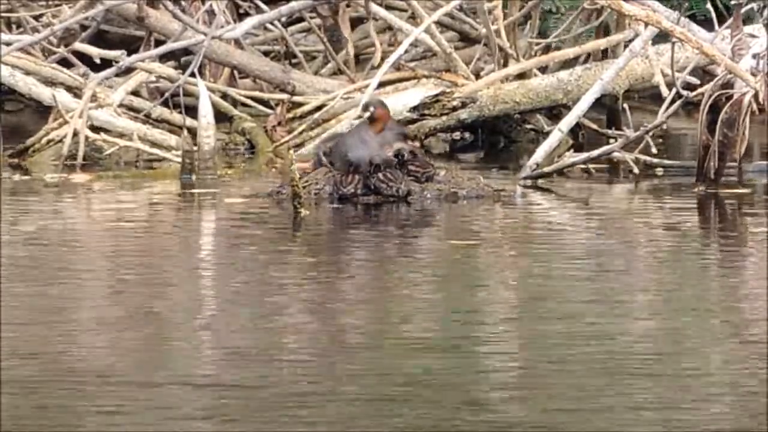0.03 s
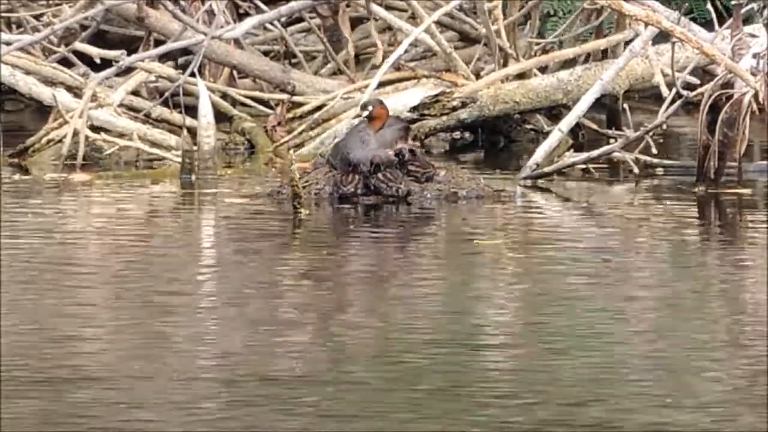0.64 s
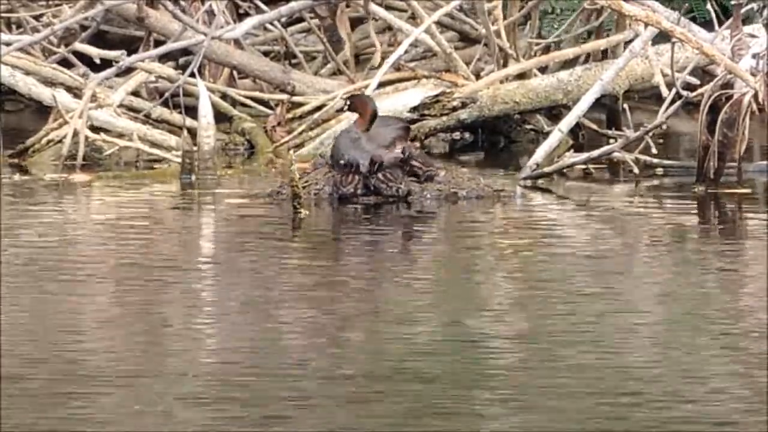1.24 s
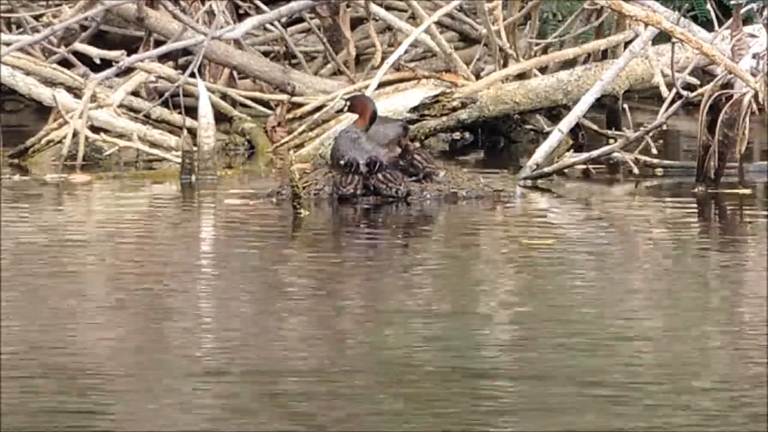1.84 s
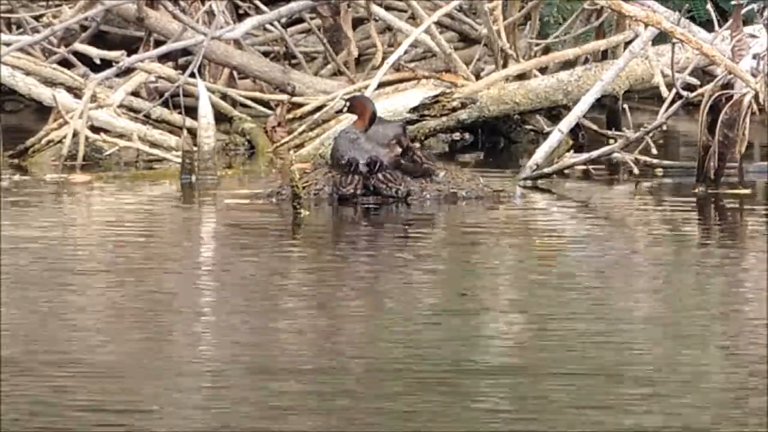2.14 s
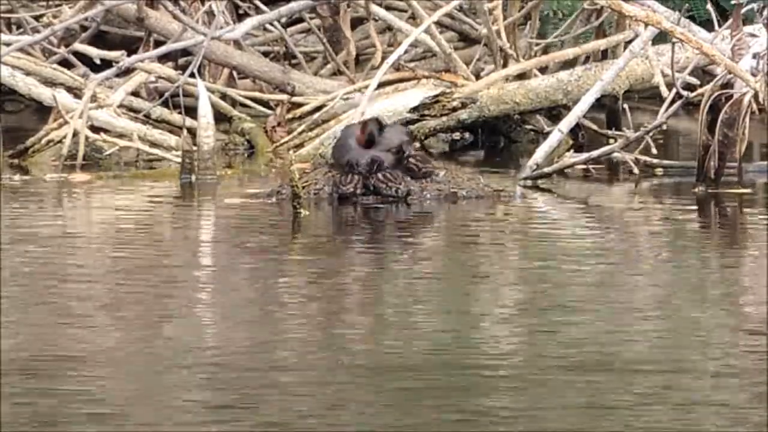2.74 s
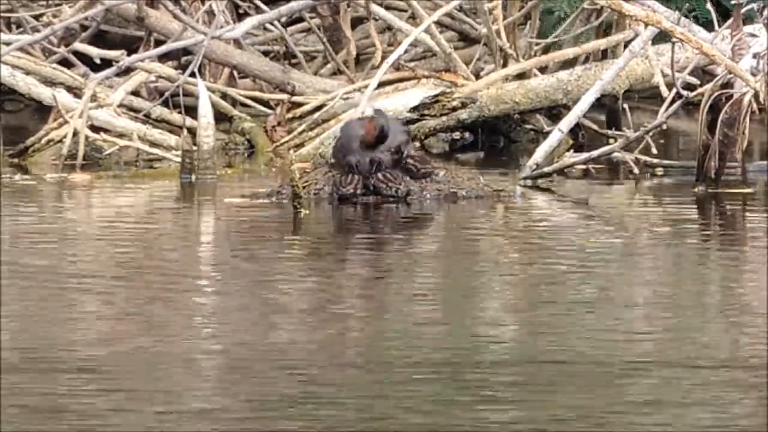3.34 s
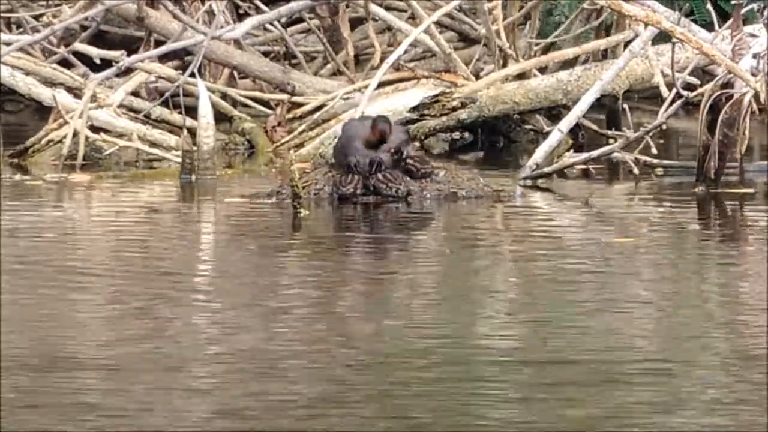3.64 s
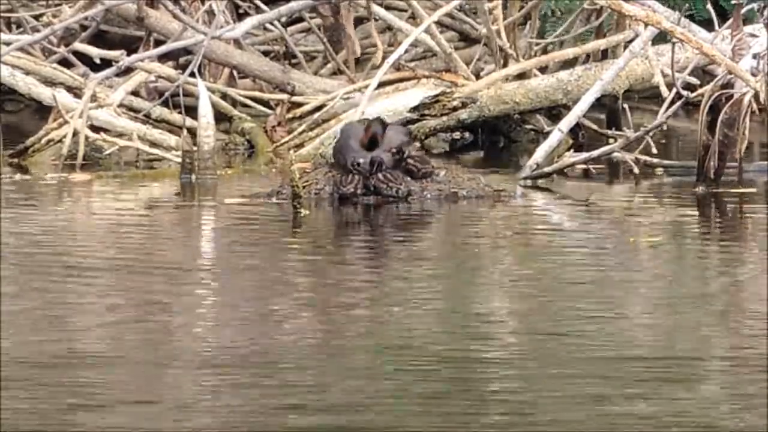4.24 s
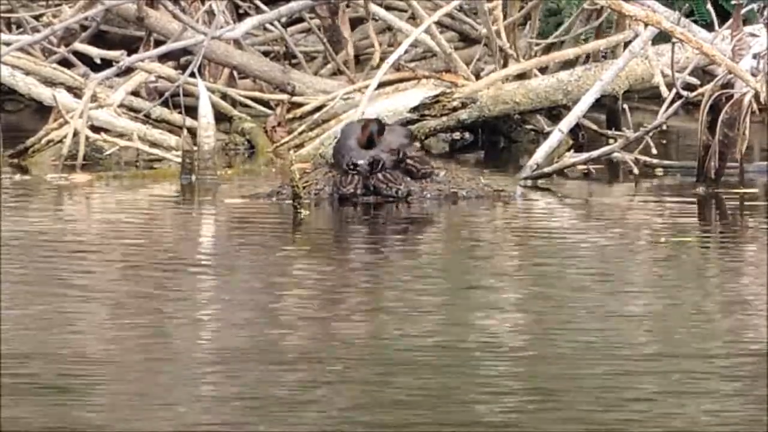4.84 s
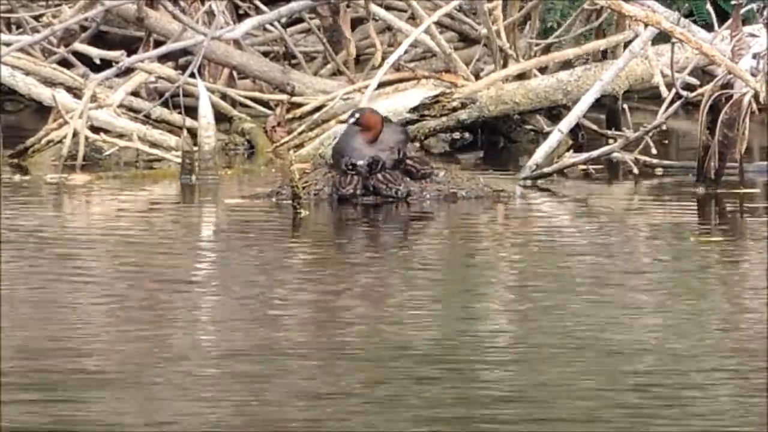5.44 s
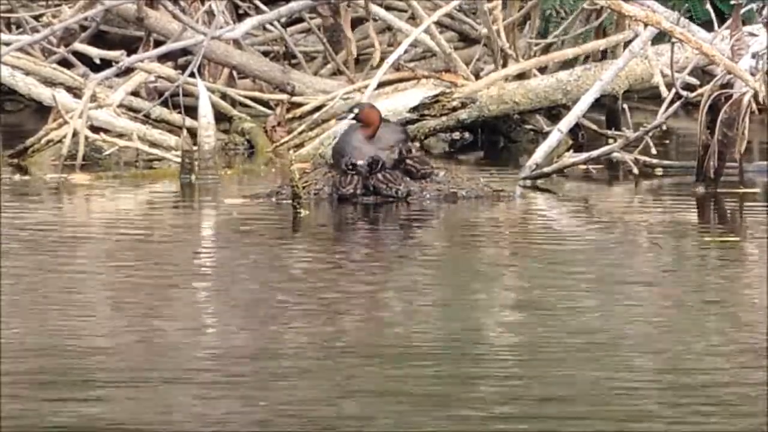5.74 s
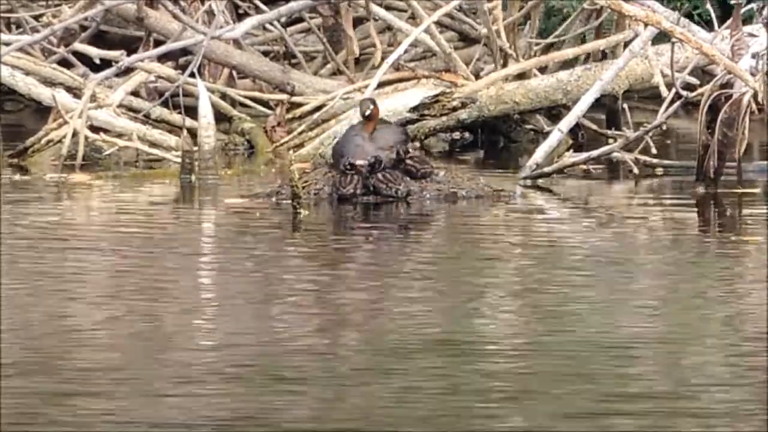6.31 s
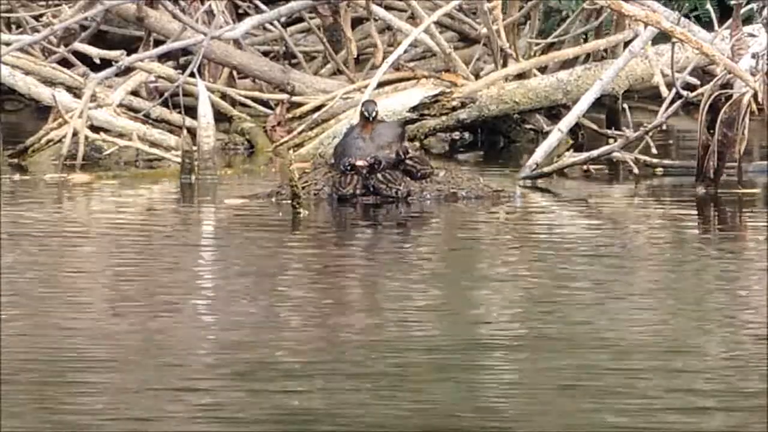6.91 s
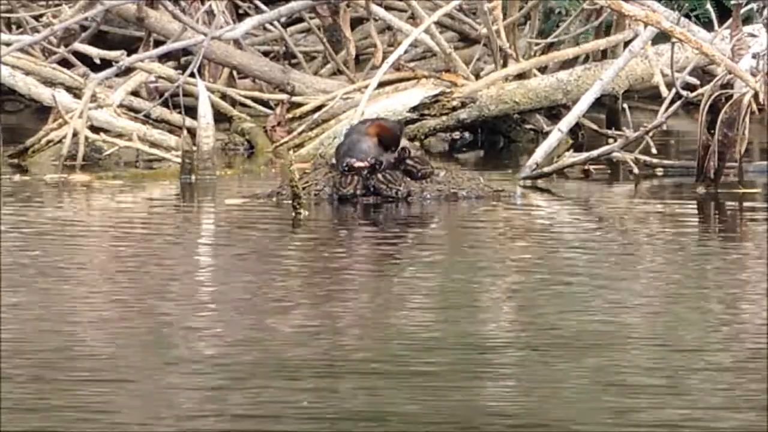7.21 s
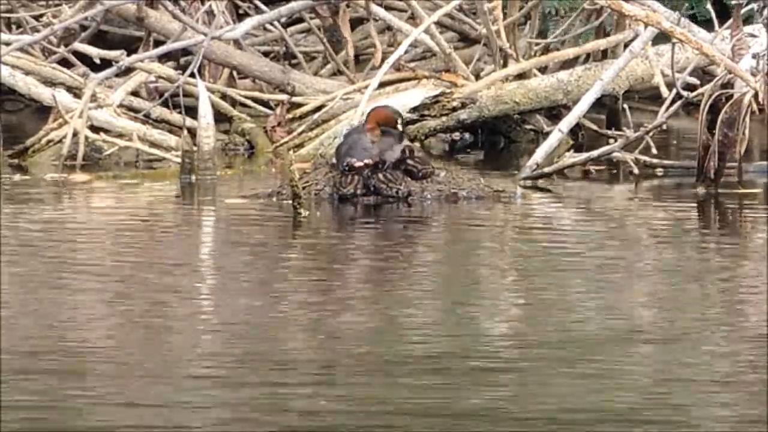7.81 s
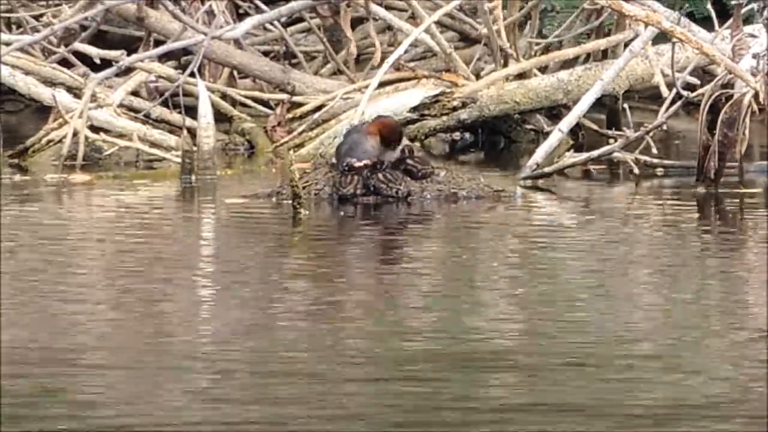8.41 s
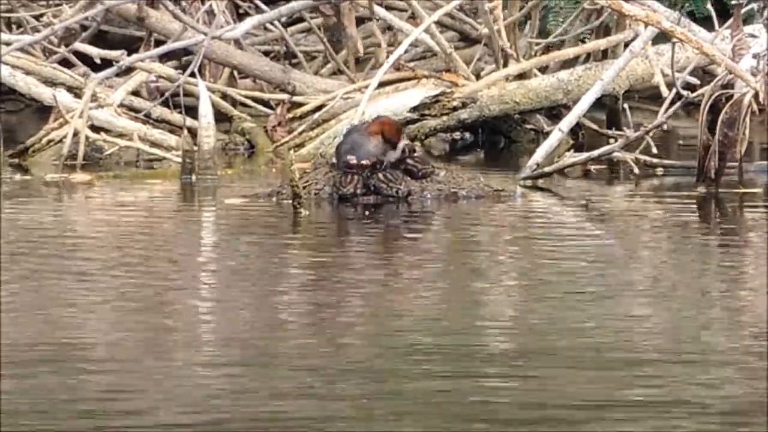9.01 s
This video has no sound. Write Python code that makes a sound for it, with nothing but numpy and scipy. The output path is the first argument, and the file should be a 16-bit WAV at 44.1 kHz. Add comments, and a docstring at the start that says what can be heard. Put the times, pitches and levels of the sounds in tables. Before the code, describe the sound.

At the edge of a pond, faint crickets and scattered bird chirps sit over a constant hiss and low road rumble. Midway, a small waterbird stands out with a fast trill of alternating dipping and rising notes, with a slight echo from the bank. Later a bird scolds faintly among soft dry ticks, a distant engine gathers speed, and another bird gives a short falling whistle.

```python
"""Distant traffic rumbles, bush-crickets buzz in the reeds and far birds whistle, cluck and chirp.
About four seconds in comes the main sound, a grebe trilling on the pond: two syllables take turns,
each a few quick glides of one whistle, echoed by the wooded bank. The crickets scrape their wings,
the two nearest in regular rising verses. A few soft ticks sound by the water's edge,
and near the end one engine gathers speed."""
import sys
import numpy as np
from scipy import signal
from scipy.fft import rfft, irfft
from scipy.io import wavfile

SR = 44100
rng = np.random.default_rng(int(sys.argv[2]) if len(sys.argv) > 2 else 0)


def log_audio(samples):
    """Write samples as a 16-bit WAV file to the path given in sys.argv[1]."""
    # one column per channel
    frames = np.atleast_2d(samples).T
    # limit to full scale, then quantise
    limited = np.clip(frames, -1, 1)
    pcm = np.round(limited * 32767).astype(np.int16)
    wavfile.write(sys.argv[1], SR, pcm)


N = 399546
TIME = np.arange(N) / SR

# The glides that make up the grebe's dipping and rising syllables. Each row: delay and length in
# seconds, base pitch at the start, middle and end in Hz, relative level and swell in dB, rattle (0-1).
DIP_GLIDES = [(.005, 0.0059, 2220, 2415, 2610, -0.5, -2, 0),
              (.018, 0.0269, 2782, 2100, 2180, 1.3, 5.5, 0.15), (.06, 0.0167, 3400, 3120, 3000, -10, 6, 1),
              (.064, .017, 2620, 2598, 2620, -3.5, 0, 0.7)]
RISE_GLIDES = [(0, 0.0245, 2022, 2183, 2190, -3, 2, 0.11), (.022, 0.008, 2200, 2345, 2760, 0.5, -3, 0),
               (.037, .034, 3520, 3270, 3400, -10.5, 1, 0), (.069, 0.0085, 3120, 2530, 2280, -5.5, 2, 0.25)]
# When each syllable is sung. Each row: start in seconds, relative level in dB, pitch multiplier,
# brightness in dB per octave, lean to the left in dB, accent on the last glide in dB.
DIP_CALLS = [(3.823, -45, 0.94, 3, 3, 2), (4.073, -42.5, 1.02, -7, 4, -1.5), (4.335, -45, 1.02, 1, 4, -2.5),
             (4.6, -43, 1, -2.5, 1, -1), (4.868, -44, 1, -5, 0, 1), (5.141, -41.5, 1.02, 10, -0.5, -1),
             (5.417, -42.5, 0.99, 5, 0, 0.5)]
RISE_CALLS = [(3.944, -46, 1.05, -8, 3, 0), (4.202, -45.5, 1.03, -3, 1, 0.5), (4.468, -42.5, 1, 6, 2, -1),
              (4.733, -42, 1.015, -2, -2.5, -3), (5.003, -42, 1, -1, 2, -2), (5.276, -44.5, 1, -15, 1, 5.5),
              (5.556, -43.5, 1, 4, 3, -2)]

def grebe(level_db=0.5):
    """Dipping and rising syllables take turns, seven to eight a second, slowing a little."""
    dips = calls(DIP_GLIDES, DIP_CALLS, rattle_hz=207, swing=0.07, jitter=0.017)
    rises = calls(RISE_GLIDES, RISE_CALLS, rattle_hz=210.5, swing=0.14, jitter=0.016)
    trill = water_reflection(throat(dips + rises))
    return gain_of(level_db) * bank_echo(
        trill, echo_db=-9.8, lag_samples=2, ring_hz=2200, ring_width_hz=170, ring_db=2.8,
        build_s=0.0089, far_bank_db=4, far_bank_s=0.1, spread_s=0.039, ahead=0.56)

def calls(glides, rows, rattle_hz, swing, jitter, flutter_db=1.44):
    """A bird repeats one pattern of glides; a bright call favours its high pitches."""
    out = np.zeros((2, N))
    centre_hz = np.median([row[3] for row in glides])
    for start, db, pitch, brightness, pan_db, accent_db in rows:
        for k, (delay, length, *pitches, glide_db, swell_db, rattle) in enumerate(glides):
            note = glide(length, pitch * np.array(pitches), jitter, rattle, rattle_hz, swing,
                         flutter_db=flutter_db)
            progress = np.linspace(-0.5, 0.5, len(note))
            octaves = np.log2(np.interp(progress, [-0.5, 0, 0.5], pitches) / centre_hz)
            level_db = db + glide_db + brightness * octaves + swell_db * progress
            level_db += accent_db * (k == len(glides) - 1)
            add(out, start + delay, gain_of(level_db) * note, pan_db)
    return out

def glide(length, pitches, jitter, rattle=0, rattle_hz=0, swing=0,
          taper=0.28, uneven=1, overtone_db=-32, flutter_db=1):
    """One note bends through three pitches; a rattle chops its level and swings its pitch."""
    t = np.arange(0, length, 1 / SR)
    hz = np.polyval(np.polyfit([0, 0.5, 1], pitches, 2), t / length)
    shake = rattle * np.cos(2 * np.pi * rattle_hz * t + uneven * wander(len(t), 60))
    flutter = gain_of(flutter_db * wander(len(t), 250))
    level = signal.windows.tukey(len(t), taper) * flutter * (1 + 0.5 * shake)
    return level * whistle(hz * (1 - swing * shake), jitter, overtone_db)

def whistle(hz, jitter, overtone_db):
    """A bird's voice box makes a nearly pure tone with an unsteady pitch."""
    phase = phase_of(hz * (1 + jitter * wander(len(hz), 600)))
    return np.sqrt(2) * (np.sin(phase) + gain_of(overtone_db) * np.sin(2 * phase))

def throat(x, hz=2400, width_hz=650, leak=0.36):
    """The throat rings at one pitch, swelling each glide that sweeps through it."""
    return leak * x + (1 - leak) * signal.lfilter(*signal.iirpeak(hz, hz / width_hz, SR), x)

def water_reflection(x, hz=2430, width_hz=420, depth=0.75):
    """Sound bouncing off the water weakens a narrow band on the left and boosts it on the right."""
    band = signal.lfilter(*signal.iirpeak(hz, hz / width_hz, SR), x)
    return x + band * np.array([[-depth], [0.25]])

# How long the bank echoes. Each row: frequency in Hz, seconds to fade by 60 dB when linger is 1.
BANK_FADE = [(500, 1), (2200, 0.8), (3400, 0.55), (4500, 0.6), (9000, 0.15)]

def bank_echo(x, echo_db, lag_samples, ring_hz=2300, ring_width_hz=350, ring_db=5, build_s=0.0017,
              far_bank_db=0, far_bank_s=0.089, spread_s=0.025, ahead=0.14, echoes_per_s=2500, linger=1):
    """Sound reaches the right side first; branches scatter an echo that the far bank can swell again."""
    t = np.arange(SR) / SR
    swell = (1 - np.exp(-t / build_s)) * gain_of(far_bank_db * bump(t, far_bank_s, spread_s))
    bounces = rng.standard_normal((3, SR)) * (rng.random((3, SR)) < echoes_per_s / SR) * swell
    # The share that comes from straight ahead is alike on both sides.
    bounces = np.sqrt(1 - ahead) * bounces[:2] + np.sqrt(ahead) * bounces[2]
    hz, seconds, bands = signal.stft(bounces, SR, nperseg=256)
    bands *= gain_of(-60 * seconds / (linger * at_hz(BANK_FADE, hz))[:, None])
    energy = np.mean(np.sum(signal.istft(bands, SR)[1] ** 2, axis=1))
    colour = gain_of(ring_db * bump(hz, ring_hz, ring_width_hz))[:, None]
    tail = signal.istft(bands * colour / np.sqrt(energy), SR)[1]
    echo = signal.fftconvolve(x.mean(0)[None], tail, axes=1)[:, :N]
    direct = np.array([np.roll(x[0], lag_samples), x[1]])
    return direct + gain_of(echo_db) * echo

# The glides of a cluck and when it is called. Rows read like DIP_GLIDES and DIP_CALLS.
CLUCK_GLIDES = [(0, 0.0075, 2200, 2350, 2650, -5, -3, .2), (.007, 0.0125, 2720, 2402, 2490, -4.5, 9, .5),
                (.02, 0.0066, 2490, 2314, 2150, 0, -1, 0.17), (.028, 0.011, 2480, 2445, 2470, -9.5, -4, .3),
                (.047, 0.015, 1660, 1888, 1990, -8, 3, .25)]
CLUCK_CALLS = [(1.258, -46, 1, -2, -6, 0), (1.575, -42.3, 1.004, -1, -6, 0),
               (7.402, -48.5, 1.03, 0, -7, 0.82), (7.579, -49.5, 1, 0, -5, 1)]

def clucking_bird():
    """Each cluck is three quick flicks of the voice, a soft ending and a low after-note."""
    clucks = calls(CLUCK_GLIDES, CLUCK_CALLS, rattle_hz=262, swing=0.055, jitter=0.033)
    return bank_echo(
        clucks, echo_db=-5.5, lag_samples=1, ring_hz=2370, ring_width_hz=170, ring_db=-4, build_s=0.0074,
        far_bank_db=2, far_bank_s=0.064, spread_s=0.0094, ahead=0.39, echoes_per_s=420, linger=0.75)

# The glides of a long whistle and when it is called. Rows read like DIP_GLIDES and DIP_CALLS.
WHISTLE_GLIDES = [(0, 0.022, 1850, 1835, 1830, -13, 5, .15),
                  (.012, 0.152, 1826, 1750, 1710, -4, -2.5, 0.03),
                  (.138, .065, 1730, 1496, 1260, -9, 7, 0.49)]
WHISTLE_CALLS = [(3.933, -47, 0.995, 0, -12, -0.098), (8.556, -47, 0.985, 0, -6.5, -0.84)]

def whistling_bird():
    """A long whistle holds nearly one pitch, then drops at its end."""
    song = calls(WHISTLE_GLIDES, WHISTLE_CALLS, rattle_hz=124, swing=0.14, jitter=0.0066, flutter_db=0.3)
    return bank_echo(song, echo_db=-10.5, lag_samples=8)

# Clear and rasping notes of far birds. Each row: start and length in seconds, middle pitch in Hz,
# slide in octaves, level in dB, lean to the left in dB.
CLEAR_NOTES = [(0.04, 0.24, 1617, -0.67, -65.5, -9), (0.887, 0.053, 2380, 0.057, -63.5, -5),
               (1.365, .022, 2980, -0.26, -61, -2), (1.875, 0.032, 2710, .32, -61.5, -5),
               (1.972, 0.031, 2960, -.2, -64, -3), (2.132, 0.02, 2745, 0.079, -56.5, 0),
               (2.154, 0.023, 4340, -0.079, -53, 3), (2.218, .05, 3930, 0.33, -69, 4),
               (2.27, 0.05, 4700, .08, -65, 2), (3.138, 0.034, 2650, -0.21, -57.5, -2),
               (3.74, 0.035, 2680, -0.2, -58.5, -3), (3.78, 0.026, 4130, .08, -61, 0),
               (3.81, 0.022, 3950, -.15, -61, 0), (3.829, 0.019, 3140, 0.2, -47, -1),
               (3.847, 0.016, 3110, 0.5, -47.5, -1), (3.861, 0.013, 3310, 0.66, -50, -1),
               (3.875, 0.022, 3540, 0.15, -51, -2), (4.086, 0.1, 4430, -.05, -64, 6),
               (4.257, 0.043, 1116, -0.22, -61, 2), (5.251, 0.018, 3060, 0.11, -47.5, -3),
               (5.27, 0.022, 2960, 0.3, -51, -5), (5.299, 0.018, 3420, .15, -57, 4),
               (5.388, 0.052, 3220, -.03, -64, 4), (5.961, 0.0066, 2870, .15, -53, 1),
               (6.5, .019, 2810, -.15, -63, -4.5), (6.656, 0.019, 1660, 0.086, -58, 0),
               (7.04, 0.016, 2950, 0.14, -53, -2), (7.057, .014, 2550, 0.13, -57, 0),
               (7.071, 0.012, 2980, .2, -58, -2), (7.081, 0.015, 2220, .2, -58, 0),
               (7.098, 0.028, 3560, .05, -67, 0), (8.742, .017, 2740, 0.065, -54, 0),
               (8.758, .016, 3180, .15, -61, 0), (8.255, 0.1, 5050, 0.27, -70, 4),
               (8.368, 0.11, 3930, 0.16, -70, 7), (8.879, 0.053, 1104, 0.08, -60.5, 6),
               (8.958, 0.025, 1724, 0.16, -52, 0)]
RASPING_NOTES = [(.785, .045, 2525, -0.0084, -63.5, -4), (1.96, 0.027, 2290, -0.022, -62, -5),
                 (2.038, .02, 2330, 0.077, -62, -5), (2.103, .034, 2300, 0.22, -60, -4),
                 (2.056, .03, 3950, .1, -62, 0), (2.083, 0.056, 4270, .08, -57.5, 0),
                 (2.06, .12, 6600, 0, -68, 0), (5.318, .045, 3290, -.15, -63, 6),
                 (5.903, .032, 3070, .25, -60, 5), (5.933, 0.02, 3220, .2, -55.5, 1),
                 (5.949, .014, 2900, -.2, -59, 1), (5.964, .016, 3140, .15, -54, 1),
                 (5.98, .022, 3130, 0, -60, 1), (6.921, .07, 3050, 0.156, -65, 0),
                 (7, .05, 3740, -0.0051, -64.5, -3), (8.68, .06, 2910, 0.27, -65, 0),
                 (8.775, .06, 2700, 0, -66, 0), (8.786, 0.025, 3720, .05, -62, 0),
                 (8.834, 0.036, 1804, -0.17, -57.5, -5)]

def far_birds(arch=0.0494, pips_per_s=1.2, pip_s=0.03, pip_hz=2650, pip_db=-70):
    """Birds around the pond sing clear arched notes, unevenly warbling rasps and faint random pips."""
    out = np.zeros((2, N))
    slope = np.array([-0.5, 0, 0.5])
    for start, length, hz, octaves, db, pan_db in CLEAR_NOTES:
        pitches = hz * 2 ** (octaves * slope) * [1 - arch, 1, 1 - arch]
        note = glide(length, pitches, jitter=0.017, taper=0.43, overtone_db=-19)
        add(out, start, gain_of(db) * note, pan_db)
    for start, length, hz, octaves, db, pan_db in RASPING_NOTES:
        rasp = glide(length, hz * 2 ** (octaves * slope), jitter=0.051, rattle=0.8, rattle_hz=62,
                     swing=0.061, taper=0.19, uneven=1.6, overtone_db=-20)
        add(out, start, gain_of(db) * rasp, pan_db)
    for when, pitch, bend, side in rng.uniform(-1.1, 1, (round(pips_per_s * N / SR), 4)):
        pip = glide(pip_s, pip_hz * 2 ** (0.3 * (pitch + bend * slope)), jitter=0.01)
        add(out, (when + 1) / 2 * N / SR, gain_of(pip_db) * pip, pan_db=4 * side)
    return bank_echo(out, echo_db=-8.5, lag_samples=3, ring_db=2, linger=0.85)

# Scolding notes. Each row: start and length in seconds, first and last pitch in Hz, level in dB.
SCOLD_NOTES = [(7.874, .006, 2450, 2650, -60), (7.881, 0.0085, 2400, 2050, -50),
               (7.899, .024, 3540, 2245, -57), (7.929, 0.005, 2250, 3000, -56),
               (7.933, .007, 2880, 2250, -53), (7.944, .01, 2700, 3900, -58),
               (7.954, 0.022, 3790, 2330, -56.5), (7.985, 0.0097, 3000, 2400, -54),
               (7.997, .007, 3000, 3400, -61), (8.013, .02, 3500, 2500, -59),
               (8.041, 0.0077, 3090, 2400, -58), (8.056, .007, 2800, 2300, -58),
               (8.064, .021, 3750, 3050, -60), (8.164, .007, 2890, 2550, -62),
               (8.184, 0.0085, 2770, 2150, -59), (8.24, .008, 3100, 2150, -58),
               (8.25, .009, 3400, 2700, -62)]

def scolding_bird(arch=0.062, swell_db=6, rasp_db=-11, rasp_hz=520):
    """Deep in the branches a bird fires off hoarse notes; each grows louder and most slide down."""
    out = np.zeros((2, N))
    for start, length, first_hz, last_hz, db in SCOLD_NOTES:
        pitches = [first_hz, (1 + arch) * (first_hz + last_hz) / 2, last_hz]
        note = glide(length, pitches, jitter=0.038, rattle=0.65, rattle_hz=200, swing=0.06)
        note *= 1 + gain_of(rasp_db) * wander(len(note), rasp_hz)
        add(out, start, gain_of(db + swell_db * np.linspace(-0.5, 0.5, len(note))) * note, pan_db=0)
    return bank_echo(out, echo_db=-3.5, lag_samples=3, ring_db=0, build_s=0.004, linger=0.7)

# Ticks near the water's edge. Each row: start in seconds, level in dB.
TICK_TIMES = [(2.585, -52.5), (7.757, -54), (7.881, -50), (7.97, -49), (8.062, -52), (8.092, -58),
              (8.188, -52), (8.242, -50), (8.256, -56)]
# Their tone. Each row: frequency in Hz, strength in dB.
TICK_TONE = [(300, -13), (900, 5), (2200, 4), (4000, -4), (7000, -28), (14000, -40)]

def ticks(decay_s=0.015, attack_s=0.0015):
    """Soft dry ticks: short dull puffs of noise with a quick start."""
    level = sum(gain_of(db) * np.clip((TIME - start) / attack_s, 0, 1)
                * np.exp(-abs(TIME - start) / decay_s) for start, db in TICK_TIMES)
    return noise(TICK_TONE) * level

# The two nearest crickets. Each row: end of the first verse, repeat time and verse length in seconds,
# first and top pitch in Hz, relative level and lean to the left in dB, then in seconds the loudest
# moment and how slowly the song fades either side of it.
NEAR_CRICKETS = [(0.422, .9, 0.82, 9710, 10190, -68.5, 0, 0.99, 2.9),
                 (2.464, .825, 0.33, 9990, 10370, -71, -18, 5.5, 2.6)]

def cricket_verses(width_hz=110, swell_db=4, taper=0.19):
    """Each near cricket repeats a verse that climbs in pitch, swells and stops."""
    out = np.zeros((2, N))
    for end, period, length, first_hz, top_hz, db, pan_db, loudest, fade_s in NEAR_CRICKETS:
        progress = np.clip(1 - (end - TIME) % period / length, 0, 1)
        gate = np.clip(np.minimum(progress, (1 - progress) * 2) / taper, 0, 1)
        level = gate * gain_of(db + swell_db * (progress - 1.5)) * bump(TIME, loudest, fade_s * 2 ** 0.5)
        tone = np.exp(1j * phase_of(first_hz + (top_hz - first_hz) * progress))
        blur = wander(N, width_hz) + 1j * wander(N, width_hz)  # smears the tone into narrow noise
        add(out, 0, level * (tone * blur).real, pan_db)
    return out

# The far crickets' tone. Each row: frequency in Hz, strength in dB.
CHORUS_TONE = [(7500, -42), (8750, -14), (9300, -3.5), (9720, 0.5), (10080, -2), (10300, -5),
               (10550, -12.5), (11800, -34)]
# Their loudness. Each row: time in seconds, relative level in dB.
CHORUS_LEVEL = [(0, -66.5), (3.5, -66), (4.2, -65), (4.85, -66), (5, -67.5), (7.3, -67), (9.06, -66.3)]

def crickets(stroke_hz=101, left_depth=0.15, right_depth=0.2, chorus_db=2, drift_hz=70, flicker_db=0.97):
    """Wing strokes scrape out puffs of high noise; a flickering chorus lies behind the near verses."""
    stroke = np.cos(phase_of(stroke_hz + 1.82 * wander(N, 3.34)))
    pulsing = 1 + np.array([[left_depth], [right_depth]]) * stroke
    drift = np.exp(1j * phase_of(drift_hz * wander(N, 4)))
    chorus = (signal.hilbert(noise(CHORUS_TONE)) * drift).real  # slides the whole band up and down
    chorus *= gain_of(chorus_db + follow(CHORUS_LEVEL)[0])
    return (chorus + cricket_verses()) * pulsing * gain_of(flicker_db * wander(N, 16))

# The far road's tone. Each row: frequency in Hz, strength in dB.
RUMBLE_TONE = [(10, -10.5), (25, -5), (45, -3), (64, -5), (80, 4), (100, -7), (130, -8), (175, -12),
               (220, -18), (300, -20), (450, -28), (900, -71)]

def road_rumble(level_db=-43):
    """A far road makes a deep, slightly unsteady noise."""
    return noise(RUMBLE_TONE) * gain_of(level_db + 0.65 * wander(N, 6.1))

# The nearer traffic's tone. Each row: frequency in Hz, strength in dB.
HUM_TONE = [(60, -26), (100, -4.5), (122, 4), (175, -2.5), (230, -9.5), (300, -11), (500, -33), (1200, -88)]
# Its loudness. Each row: time in seconds, level in dB.
HUM_LEVEL = [(0, -60.5), (2.7, -54.5), (3.05, -51.5), (3.7, -54), (4.15, -46.5), (4.9, -51.5), (7.3, -48.5),
             (7.7, -51), (9.06, -50)]

def traffic_hum():
    """Nearer traffic makes a low hum that swells and eases."""
    return noise(HUM_TONE) * gain_of(follow(HUM_LEVEL)[0])

# One engine. Each row: time in seconds, firings per second, level in dB.
ENGINE_RUN = [(7.5, 134, -71), (7.9, 139, -51.5), (8.25, 142.2, -43), (8.65, 146.5, -45.5),
              (9.06, 151.7, -46)]

def engine():
    """An engine's firings blend into a low tone that rises as it speeds up."""
    firing_hz, db = follow(ENGINE_RUN)
    tone = np.sqrt(2) * np.sin(phase_of(firing_hz + 1.474 * wander(N, 11)))
    return tone * gain_of(db + 0.59 * wander(N, 12))

# The drone's loudness. Each row: time in seconds, relative level in dB.
DRONE_LEVEL = [(0, -63), (1.7, -60.5), (3.3, -67), (4.5, -56.5), (5.6, -60.5), (7.4, -60), (8.2, -64),
               (9.06, -59)]

def drone(hz=346, level_db=1):
    """A faint tone in the traffic wavers in pitch and loudness."""
    tone = np.sin(phase_of(hz + 4.475 * wander(N, 12.07)))
    return tone * gain_of(level_db + follow(DRONE_LEVEL)[0] + 3.45 * wander(N, 3.7))

# The tone of the outdoor hiss. Each row: frequency in Hz, strength in dB.
HISS_TONE = [(100, 1), (400, 0.5), (600, -0.5), (1000, -1), (1500, -5.5), (2500, -8), (4000, -14.5),
             (6000, -17.5), (8000, -19.5), (13400, -22.5), (13900, -37), (16000, -54)]
# Its loudness. Each row: time in seconds, relative level in dB.
HISS_LEVEL = [(0, -61.5), (6.5, -61.5), (7.3, -60.5), (9.06, -61)]

def outdoor_hiss(level_db=7.5):
    """A soft, nearly steady wash of noise lies behind everything."""
    return noise(HISS_TONE) * gain_of(level_db + follow(HISS_LEVEL)[0] + 0.5 * wander(N, 11))

# How alike left and right sound. Each row: frequency in Hz, likeness (0-1).
SIDE_LIKENESS = [(25, 0.93), (60, 0.99), (130, 1), (290, 0.89), (640, 0.53), (1400, 0.28), (3000, 0.0075),
                 (15000, 0.16)]

def noise(tone):
    """Stereo noise with the given tone; long waves reach both sides alike."""
    hz = np.fft.rfftfreq(N, 1 / SR)
    left, other = rfft(rng.standard_normal((2, N)))
    likeness = at_hz(SIDE_LIKENESS, hz)
    right = likeness * left + np.sqrt(1 - likeness ** 2) * other
    return unit_level(irfft(np.array([left, right]) * gain_of(at_hz(tone, hz)), N))

def wander(size, hz):
    """A smooth random wobble, about 1 in size, that moves up to about hz times a second."""
    padded = size + SR // 4
    smoothing = bump(np.fft.rfftfreq(padded, 1 / SR), 0, hz)
    return unit_level(irfft(rfft(rng.standard_normal(padded)) * smoothing))[:size]

def add(mix, start, sound, pan_db):
    """Places a sound at its start time; a positive pan_db leans it left."""
    part = mix[:, max(round(start * SR), 0):][:, :len(sound)]
    part += gain_of([[pan_db / 2], [-pan_db / 2]]) * sound[:part.shape[1]]

def at_hz(rows, hz):
    """Reads a frequency table between its rows, giving each octave equal room."""
    row_hz, values = np.transpose(rows)
    return np.interp(np.log(hz + 1), np.log(row_hz + 1), values)

def follow(rows):
    """Turns each column of a time table into a curve across the whole scene."""
    seconds, *columns = np.transpose(rows)
    return [np.interp(TIME, seconds, column) for column in columns]

def bump(x, centre, width):
    return np.exp(-((x - centre) / width) ** 2)

def phase_of(hz):
    return 2 * np.pi * np.cumsum(hz) / SR

def gain_of(db):
    return 10 ** (np.asarray(db) / 20)

def unit_level(x):
    return x / np.sqrt(np.mean(x ** 2) + 1e-20)

def scene():
    """Everything heard from the edge of the pond; the background leans slightly right."""
    birds = grebe() + clucking_bird() + whistling_bird() + far_birds() + scolding_bird()
    waterside = ticks() + crickets()
    background = road_rumble() + traffic_hum() + outdoor_hiss() + drone() + engine()
    return birds + waterside + background * gain_of([[-0.5], [0.5]])

def record(dry, cutoff_hz=15600):
    """Cuts away the very highest treble."""
    lowpass = signal.firwin(511, cutoff_hz, window=("kaiser", 9), fs=SR)
    return signal.oaconvolve(dry, lowpass[None], "same")

dry = scene()
out = record(dry)
log_audio(out)
```